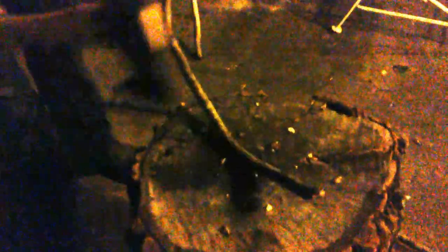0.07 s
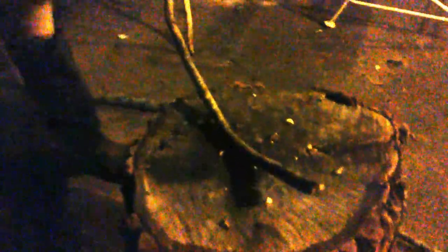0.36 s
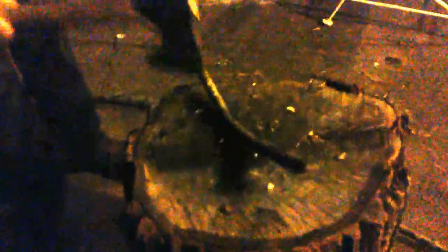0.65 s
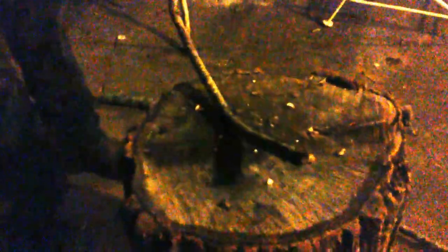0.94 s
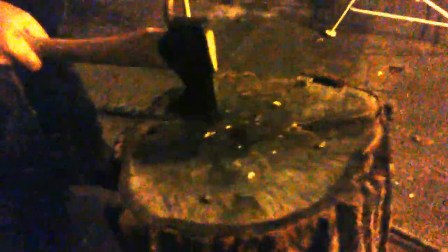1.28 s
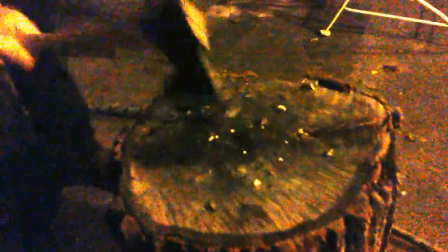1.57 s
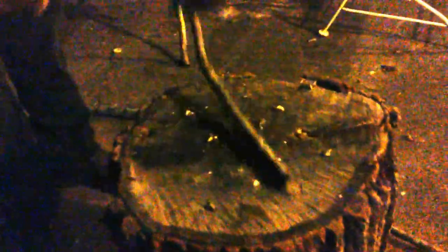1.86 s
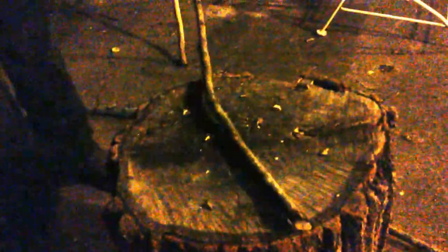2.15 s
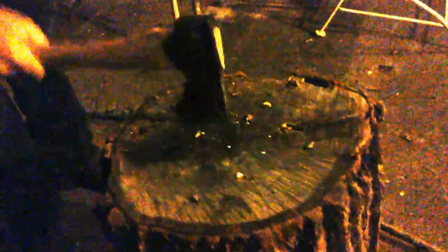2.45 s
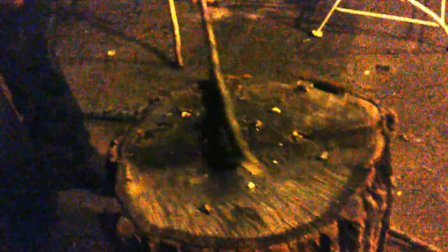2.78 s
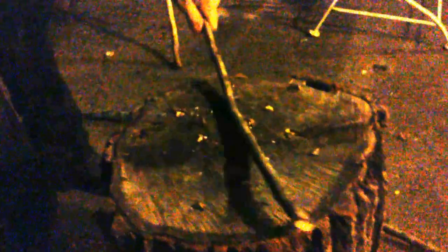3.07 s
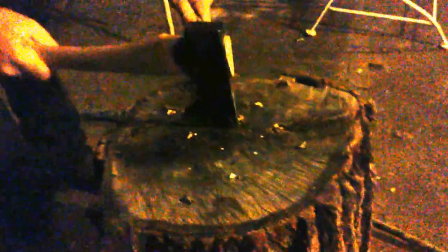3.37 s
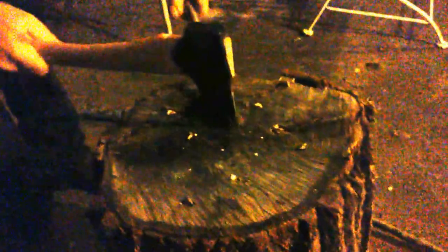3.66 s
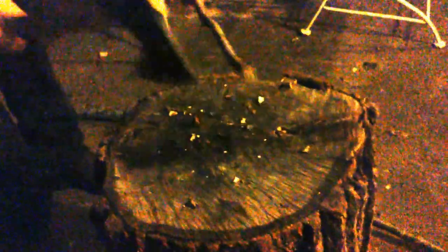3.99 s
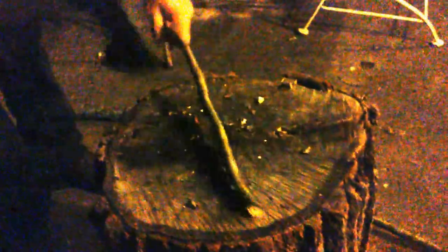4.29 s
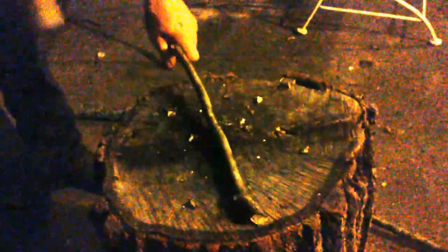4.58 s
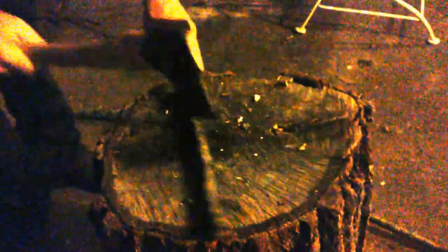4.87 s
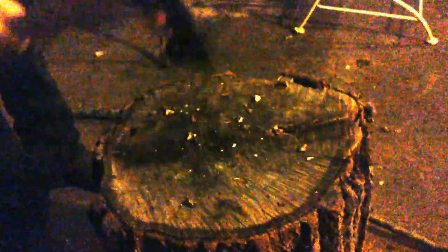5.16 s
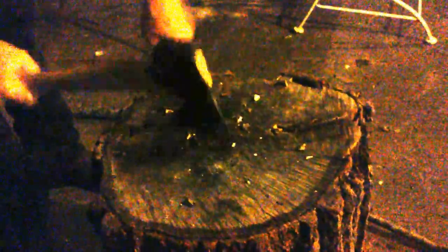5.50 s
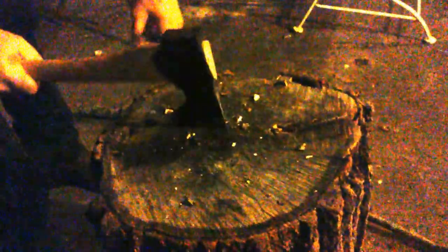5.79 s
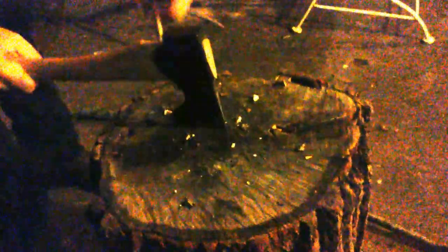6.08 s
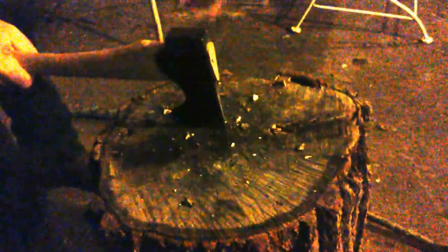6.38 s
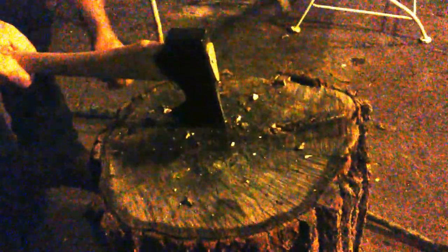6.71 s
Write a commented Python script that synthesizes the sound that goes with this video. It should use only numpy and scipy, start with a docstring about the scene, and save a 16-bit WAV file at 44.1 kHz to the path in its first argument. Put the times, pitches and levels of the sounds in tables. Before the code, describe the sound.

An axe chops a thin branch on a tree stump in a paved yard at night, close to the microphone. Six blows land at about 0.6, 1.2, 2.4, 3.3, 4.9 and 5.6 seconds, each a sharp crack with a brief woody ring, a low thud and a short wall echo. The second has the strongest stump knock, and the last cracks hardest. Light clacks come at 2 seconds, soft bark scrapes around 2.8, and a brighter clatter of cut sticks from 3.7 to 4.1. Feet shift with dull thuds around 3.1 and 5.2 seconds. At 6.1 a hand bumps the microphone with a loud, dry knock. Two last pieces of wood clatter at 6.5 and 6.7, followed by a brief scrape. Very faint crickets and a distant town hum run underneath, lifting with each blow and then sinking away.

```python
"""At night in a paved yard, crickets trill and a far town hums, close to a phone.
Then an axe chops a thin branch on a stump six times: fibres crack, the wood rings, the stump knocks,
the ground thuds and the walls echo. Between chops, bark scrapes, feet shift and cut sticks clatter.
Near the end a hand bumps the phone, and two last pieces of wood clatter.
All along, the phone's noise gate lets each blow through, then slowly turns the background down."""
import sys
import numpy as np
from scipy import signal
from scipy.fft import rfft, irfft
from scipy.io import wavfile
from scipy.ndimage import uniform_filter1d

SR = 44100
rng = np.random.default_rng(int(sys.argv[2]) if len(sys.argv) > 2 else 0)


def transcribe(u):
    """Save the signal u as a 16-bit wav file named by the first command-line argument.

    u: samples, shape (n,) or (channels, n), limited to [-1, 1]; the rate is SR.
    q: integer samples, one column per channel.
    """
    v = np.clip(np.atleast_2d(u).T, -1, 1)
    q = np.round(v * 32767).astype(np.int16)
    wavfile.write(sys.argv[1], SR, q)


N = 297234
TIME = np.arange(N) / SR
AGE = TIME[:SR // 2]  # seconds since a hit
TOP_HZ = 16000
WALL_SLAP_S = 0.021  # sound slaps back off the nearest wall this much later

# Axe swings. A tilt above 0 is brighter, below 0 duller; a mode is a tone that an object rings at.
# (time [s], time to cut through [s], crack [dB], crack tilt [dB/octave], stump knock [dB],
# stump pitch [factor], ground thud [dB], branch ring [dB], first mode [Hz], second mode [Hz])
CHOPS = [(0.6049, 0.0092, -11, -4.5, -19.5, 1.2, -18, -8.5, 1370, 2460),
         (1.2162, 0.0032, -10, 1, -4, 1.14, -24, -11, 960, 2560),
         (2.3882, 0.0025, -10, -1, -14, 1.04, -21.5, -12, 1797, 2360),
         (3.3423, 0.0032, -13, 1.5, -9, 1.04, -24, -17, 1790, 2024),
         (4.869, .0148, -10, -.5, -33, 1.9, -18.5, -5, 1628, 1877),
         (5.5818, 0.0072, -5, 1.5, -9, 1.01, -19, -4, 939, 2300)]
# Tone colour of breaking wood fibres: (frequency [Hz], level [dB])
FIBRE_SPECTRUM = [(100, -12), (300, -14), (600, -4.5), (1200, -4.5), (2300, 1.5), (3300, -4), (5300, -7.5),
                  (6900, -2), (8500, -11.5), (12000, -23), (16000, -31)]
# Tone colour of rubbing, on bark or on the phone: (frequency [Hz], level [dB])
RUB_SPECTRUM = [(200, -11.5), (700, 9), (2500, -7), (4500, -1), (7200, 6.5), (10000, -8.5), (16000, -31)]


def undb(db):
    """Turn decibels into a factor to multiply a sound by."""
    return 10 ** (np.asarray(db) / 20)


def add(out, s, sound):
    """Mix a sound into out, starting at s seconds."""
    start = max(int(s * SR), 0)
    out[start:start + len(sound)] += sound[:max(N - start, 0)]


def colour(x, spectrum, tilt_db=0):
    """Give x a tone colour, tilt it by tilt_db per octave and set its average strength (rms) to 1."""
    hz, db = np.transpose(spectrum)
    octave = np.log2(np.maximum(np.fft.rfftfreq(len(x), 1 / SR), hz[0]))
    gain = undb(np.interp(octave, np.log2(hz), db) + tilt_db * octave)
    shaped = irfft(rfft(x) * gain, len(x))
    return shaped / np.std(shaped)


def grains(size, spread_db=2.2):
    """Noise made of tiny clicks of unequal strength."""
    return rng.standard_normal(size) * undb(spread_db * np.minimum(rng.exponential(size=size), 4))


def fade(t60):
    """A smooth dying away; t60 is the fade time, the seconds it takes to drop by 60 dB."""
    return np.exp(-np.log(1000) * AGE / max(t60, 1e-3))


def ring(modes, tilt_db, pivot_hz):
    """A struck object rings with several fading tones; a harder hit tilts them towards the treble."""
    return sum((-1) ** k * undb(db + tilt_db * np.log2(hz / pivot_hz))
               * fade(t60) * np.sin(2 * np.pi * hz * AGE)
               for k, (hz, db, t60) in enumerate(modes) if hz < TOP_HZ)


def crackle(t60, tilt_db, dull_hz, rise_s):
    """One burst of breaking fibres that builds quickly and dies away."""
    muffle = signal.butter(2, min(dull_hz, TOP_HZ), fs=SR, output="sos")
    clicks = colour(grains(len(AGE)), FIBRE_SPECTRUM, tilt_db)
    return (1 - np.exp(-AGE / rise_s)) * fade(t60) * signal.sosfilt(muffle, clicks)


def yard_echo(x, wall_db=-8, build_s=0.0063):
    """What the yard sends back: a slap from the nearest wall and a short, dense tail of echoes."""
    # How long the yard echoes: (frequency [Hz], fade time [s])
    fade_times = [(60, 0.87), (400, .27), (1200, 0.32), (3000, 0.38), (7500, 0.44), (15000, 0.2)]
    hz, t60s = np.transpose(fade_times)
    log_hz = np.log(np.maximum(np.fft.rfftfreq(len(AGE), 1 / SR), 1))
    scatter = rfft(rng.standard_normal(len(AGE)))
    tail = sum(irfft(scatter * np.interp(log_hz, np.log(hz), band), len(AGE)) * fade(t60)
               for band, t60 in zip(np.eye(len(hz)), t60s))
    tail *= 1 - np.exp(-(AGE / build_s) ** 2)
    tail /= np.sqrt(np.sum(tail ** 2))
    add(tail, WALL_SLAP_S, np.array([undb(wall_db)]))
    return signal.fftconvolve(x, tail)[:N]


def town():
    """The far town is a low hum, turned down in the mix after the first second."""
    # Tone colour of the hum: (frequency [Hz], level [dB])
    spectrum = [(25, -3.5), (120, 7.5), (400, -3), (1000, 0.5), (1700, -1.5), (2300, -5.5), (3200, -9),
                (4000, -21.5), (6500, -16.5), (7300, -19.5), (10000, -35), (16000, -28.5)]
    # Level of the hum in the mix: (time [s], level [dB])
    levels = [(0, -42.5), (1, -42.5), (1.8, -50), (6.74, -49.5)]
    return undb(np.interp(TIME, *np.transpose(levels))) * colour(rng.standard_normal(N), spectrum)


def cricket(pitch_hz=5740, sweep_hz=560, strokes_per_s=83.3, uneven_db=1.2, echo_db=-11):
    """A cricket trills: each wing stroke is a short note that slides down."""
    drift = np.interp(TIME, np.linspace(0, TIME[-1], num=60), rng.standard_normal(size=60))
    strokes = np.cumsum(strokes_per_s * (1 + 0.005 * drift)) / SR
    progress = strokes % 1  # from 0 to 1 within each stroke
    force, detune = rng.standard_normal(size=(1000, 2))[strokes.astype(int)].T
    hz = pitch_hz * (1 + 0.006 * detune) + sweep_hz * (0.5 - progress)
    pulses = undb(uneven_db * force) * np.sin(np.pi * progress) ** 2
    trill = pulses * np.sin(2 * np.pi * np.cumsum(hz) / SR)
    trill = trill + undb(echo_db) * yard_echo(trill)
    return trill / np.std(trill)


def insects(chorus_db=-5):
    """A near cricket and far insects, their level in the mix turned up and down."""
    # Tone colour of the far chorus: (frequency [Hz], level [dB])
    spectrum = [(2000, -39.5), (2500, 1.5), (2750, -18), (2950, 3.5), (3100, -24.5), (3320, -7),
                (3700, -35), (4500, -22.5), (5350, -3.5), (5900, -7.5), (6400, -27)]
    # Level of the insects in the mix: (time [s], level [dB])
    levels = [(0, -47), (2.5, -49.5), (3.3, -44.5), (4.1, -49), (5.3, -42), (6.74, -52.5)]
    song = cricket() + undb(chorus_db) * colour(rng.standard_normal(N), spectrum)
    return undb(np.interp(TIME, *np.transpose(levels))) * song


def chips():
    """Tiny flying chips land with a thin, high tick."""
    # Chips landing: (time [s], level [dB])
    landings = [(0.7159, -24.5), (4.179, -33)]
    out = np.zeros(N)
    for s, db in landings:
        add(out, s, undb(db) * crackle(t60=0.01, tilt_db=15, dull_hz=TOP_HZ, rise_s=0.0001))
    return out


def bark_scrapes(slips_per_s=900, rough_db=6):
    """Rough bark catches and slips about once a millisecond in a swell of small clicks."""
    # Bark sliding over the stump: (time [s], length [s], level [dB])
    slides = [(1.387, 0.0052, -31.5), (1.828, 0.037, -49), (2.04, 0.063, -43.5), (2.758, 0.016, -40),
              (2.806, 0.019, -37.5), (2.86, 0.3, -44.5), (3.643, 0.034, -40), (3.759, 0.19, -43.5),
              (4.184, 0.13, -50.5), (6.728, 0.057, -24)]
    out = np.zeros(N)
    for s, length, db in slides:
        swell = np.sqrt(np.abs(np.sin(np.pi * np.minimum(AGE / length, 1))))
        grip = undb(rough_db * rng.standard_normal(slips_per_s))[(AGE * slips_per_s).astype(int)]
        add(out, s, undb(db) * swell * colour(grip * grains(len(AGE)), RUB_SPECTRUM))
    return out


def phone_bumps(soft_s=0.00037, rub_db=-40, rub_t60=0.12):
    """A hand's knocks and faint rub reach the microphone through the case, so they have no echo."""
    # Knocks on the phone: (time [s], level [dB], tilt [dB/octave])
    touches = [(6.0705, 9, 3.5), (6.093, -15.5, 5.5)]
    # Tones of its case: (frequency [Hz], level [dB], fade time [s])
    case_modes = [(215, -3, 0.028), (372, -3, 0.0065), (1350, -12.5, 0.0081)]
    out = np.zeros(N)
    for s, db, tilt_db in touches:
        knock = undb(db) * (1 - np.exp(-(AGE / soft_s) ** 2)) * ring(case_modes, tilt_db, pivot_hz=380)
        rub = undb(rub_db) * fade(rub_t60) * colour(rng.standard_normal(len(AGE)), RUB_SPECTRUM)
        add(out, s, knock + rub)
    return out


def low_thuds(rise_s=0.0012, chop_t60=0.33, chop_tilt_db=-7.5):
    """Dull thuds, under the chops and between them, build in a few milliseconds and rumble out."""
    # Low thuds: the tail of an earlier blow, shifting feet, the rumble after the phone bump:
    # (time [s], level [dB], fade time [s], tilt [dB/octave])
    thuds = [(0.0, -29.5, 0.43, 5.5), (2.991, -35.5, 1, -15.5), (3.186, -28.5, 0.42, -8),
             (3.738, -44, 0.15, 4), (5.05, -27, 0.59, -14), (5.229, -16.5, 0.11, -3.5),
             (5.277, -19.5, 0.32, -12), (6.094, -28, 0.2, -9.5)]
    # Tone colour of a thud: (frequency [Hz], level [dB])
    spectrum = [(25, -37), (42, -21.5), (60, -2), (80, -7.5), (108, 1.5), (150, -5), (220, 5), (330, -11),
                (500, -21.5), (1500, -70.5)]
    out = np.zeros(N)
    blows = [(s, thud_db, chop_t60, chop_tilt_db) for s, _, _, _, _, _, thud_db, *_ in CHOPS]
    for s, db, t60, tilt_db in blows + thuds:
        rumble = colour(rng.standard_normal(len(AGE)), spectrum, tilt_db)
        add(out, s, undb(db) * (1 - np.exp(-AGE / rise_s)) * fade(t60) * rumble)
    return out


def stump_knocks(chop_tilt_db=-3, detune=0.02, fade_factor=0.87):
    """The stump knocks when it stops the axe or is tapped; the pitch depends on the spot that is hit."""
    # Tones of the stump: (base frequency [Hz], level [dB], base fade time [s])
    stump_modes = [(227.7, -10.5, 0.039), (348, -4.5, 0.024), (461, -7, 0.017), (678, -2.5, 0.052),
                   (780.4, -3.5, 0.063), (855, -3, 0.049), (972, -9, 0.03), (1034, -5.5, 0.0028),
                   (1340, -15, 0.16), (1810, -19.5, 0.011)]
    # Light taps: (time [s], level [dB], pitch [factor], tilt [dB/octave])
    taps = [(1.388, -27, 1.13, 5), (2.802, -41.5, 0.87, -3), (3.652, -21.5, 0.72, -1),
            (3.738, -23, 0.97, -4), (4.284, -43.5, 1.6, 2), (5.724, -25, 1.18, 0.5)]
    out = np.zeros(N)
    blows = [(s + cut_s, knock_db, pitch, chop_tilt_db) for s, cut_s, _, _, knock_db, pitch, *_ in CHOPS]
    for s, db, pitch, tilt_db in blows + taps:
        modes = [(hz * pitch * (1 + detune * rng.standard_normal()), mode_db, t60 * fade_factor)
                 for hz, mode_db, t60 in stump_modes]
        add(out, s, undb(db) * ring(modes, tilt_db, pivot_hz=890))
    return out


def ringing_sticks(held_fade=0.7, upper_fade=0.7, slap_db=-6, detune=0.013, cross_detune=0.03):
    """A struck stick ticks, then rings as it bends back and forth."""
    # Wood snapping or clacking between chops: (time [s], level [dB], tilt [dB/octave], piece [name])
    clacks = [(0.0, -27, 2, "stub"), (1.9938, -28, 1, "branch"), (2.0421, -25.5, 0.5, "branch"),
              (2.065, -32.5, -1.5, "branch"), (2.801, -30, 6.5, "branch tip"),
              (3.738, -22, 4, "thin stick"), (3.7511, -24, 8, "thin stick"), (3.8278, -9, 1, "thin stick"),
              (3.879, -26.5, 8.5, "thin stick"), (4.0193, -17, 3.5, "stick"), (4.048, -18.5, 4.5, "stick"),
              (6.4617, -19, 5.5, "stub"), (6.4683, -9, 4, "stub"), (6.636, -27, 10.5, "offcut"),
              (6.6562, -22, 3, "offcut")]
    # Pieces of wood by name: (first mode [Hz], second mode [Hz], fade time [factor])
    pieces = {"branch": (1410, 1575, .85), "branch tip": (743, 2840, .45), "thin stick": (1135, 2680, .42),
              "stick": (1085, 2590, .55), "stub": (915, 2315, .7), "offcut": (1270, 2300, .25)}
    # A stick's higher tones: (frequency [times the second mode], level [dB], base fade time [s])
    upper_modes = [(1.07, -9.5, 0.073), (1.2, -9.5, 0.026), (1.4, -11.5, 0.026), (1.618, -9.5, 0.025),
                   (1.9, -12, 0.05), (2.72, -8.5, .014), (2.94, -4.5, 0.021), (3.8, -19.5, 0.0063)]
    out = np.zeros(N)
    # a chop pins the branch against the stump, and its ring slaps back off the nearest wall
    chopped = [(s + lag_s, db + drop_db, 0, first_hz, second_hz, held_fade)
               for s, cut_s, *_, db, first_hz, second_hz in CHOPS
               for lag_s, drop_db in [(cut_s, 0), (WALL_SLAP_S, slap_db)]]
    loose = [(s, db, tilt_db, *pieces[piece]) for s, db, tilt_db, piece in clacks]
    for s, db, tilt_db, first_hz, second_hz, fade_factor in chopped + loose:
        # (frequency [Hz], level [dB], fade time [s])
        modes = [(first_hz, -10, 0.073), (second_hz, 0, 0.061 * fade_factor)]
        # knots and bends put the higher tones a little off
        modes += [(second_hz * ratio * (1 + detune * rng.standard_normal()), mode_db,
                   t60 * fade_factor * upper_fade) for ratio, mode_db, t60 in upper_modes]
        # a stick is not round, so it also bends crosswise, more softly and at slightly different pitches
        modes += [(hz * (1 + cross_detune * rng.standard_normal()), mode_db - 6, t60)
                  for hz, mode_db, t60 in modes[1:]]
        chatter = colour(grains(len(AGE)), FIBRE_SPECTRUM, tilt_db - 2.5)
        tick = undb(-3 + 0.62 * tilt_db) * fade(t60=0.022) * chatter  # harder hits tick louder
        add(out, s, undb(db) * (ring(modes, tilt_db, second_hz) + tick))
    return out


def axe_cracks(bite_db=-11.5, slap_db=-13.5):
    """Each chop tears the branch and bites more dully into the stump; the crack slaps back off a wall."""
    out = np.zeros(N)
    for s, cut_s, db, tilt_db, *_ in CHOPS:
        tear = crackle(t60=0.041, tilt_db=tilt_db, dull_hz=15000, rise_s=0.00045)
        bite = crackle(t60=0.035, tilt_db=-4, dull_hz=4000, rise_s=0.00021)
        slap = crackle(t60=0.04, tilt_db=-1.5, dull_hz=8200, rise_s=0.0024)
        add(out, s, undb(db) * tear)
        add(out, s + cut_s, undb(bite_db) * bite)
        add(out, s + WALL_SLAP_S, undb(slap_db) * slap)
    return out


def scene():
    """Mix everything in the yard; cracks, knocks, clatter and scrapes each get a share of echo."""
    crack, knock, clatter, scrape = axe_cracks(), stump_knocks(), ringing_sticks(), bark_scrapes()
    echo = yard_echo(undb(-3) * crack + undb(-7.5) * knock + undb(-10) * (clatter + scrape))
    wood = crack + knock + clatter + scrape + echo + chips()
    return (wood + low_thuds() + phone_bumps() + insects() + town())[None]


def noise_gate(x, open_db=-29, slope=2.02, depth_db=-27, release_db_per_s=43, deaf_below_hz=255):
    """The gate turns quiet sound down; it ignores rumble, opens at once on a blow and closes slowly."""
    heard = signal.sosfilt(signal.butter(4, deaf_below_hz, "high", fs=SR, output="sos"), x)
    level_db = 10 * np.log10(np.maximum(uniform_filter1d(heard ** 2, size=440), 1e-12))
    wanted_db = np.clip(slope * (level_db - open_db), depth_db, 0)
    # the gain may jump up, but falls no faster than the release rate
    release_db = release_db_per_s * TIME
    gain_db = np.maximum.accumulate(wanted_db + release_db, axis=-1) - release_db
    return x * undb(uniform_filter1d(gain_db, size=130))


def record(dry, hiss_db=-79, low_cut_hz=40, full_scale=0.94):
    """The phone thins the deep bass, gates the sound, adds hiss, rounds peaks and cuts the top treble."""
    thinned = signal.sosfilt(signal.butter(2, low_cut_hz, "high", fs=SR, output="sos"), dry)
    hiss = undb(hiss_db) * rng.standard_normal(dry.shape)
    rounded = full_scale * np.tanh((noise_gate(thinned) + hiss) / full_scale)
    return signal.sosfilt(signal.ellip(8, 0.2, 70, TOP_HZ, fs=SR, output="sos"), rounded)


dry = scene()
out = record(dry)
transcribe(out)
```